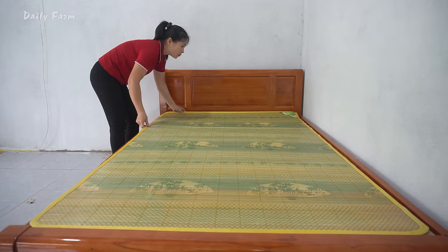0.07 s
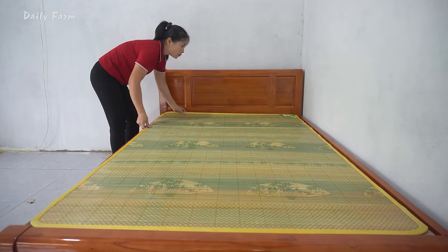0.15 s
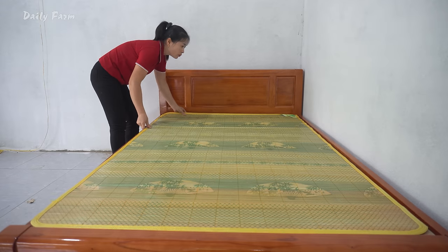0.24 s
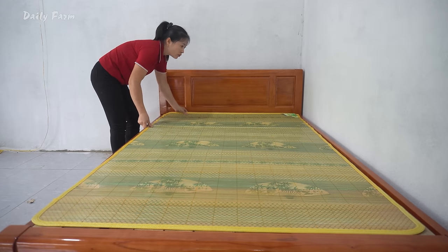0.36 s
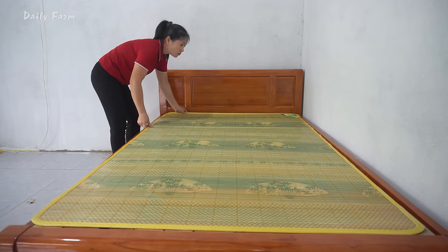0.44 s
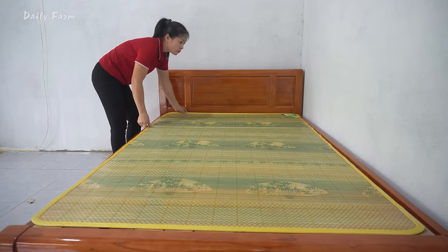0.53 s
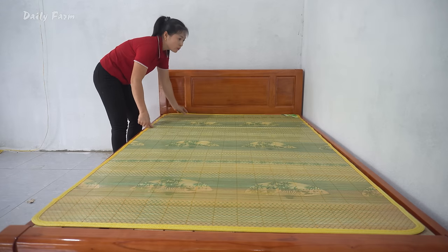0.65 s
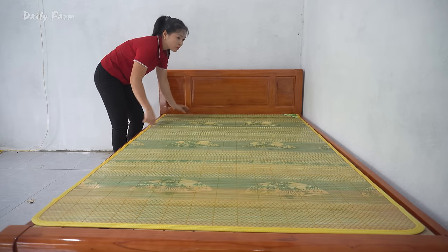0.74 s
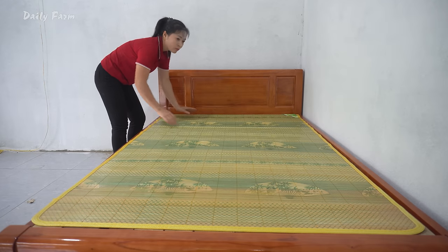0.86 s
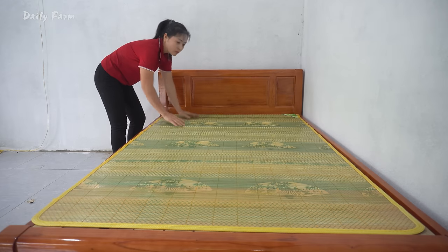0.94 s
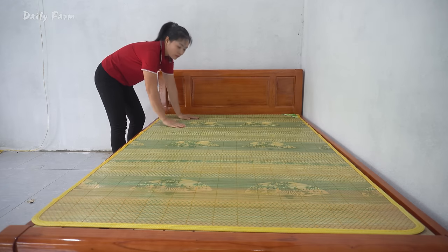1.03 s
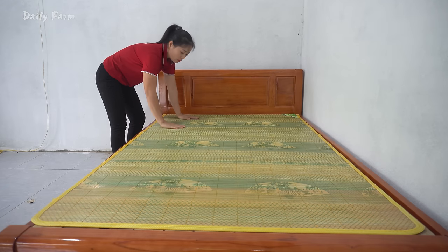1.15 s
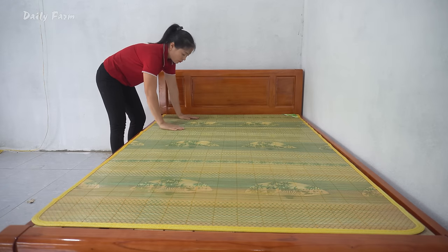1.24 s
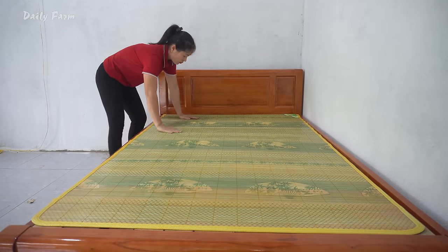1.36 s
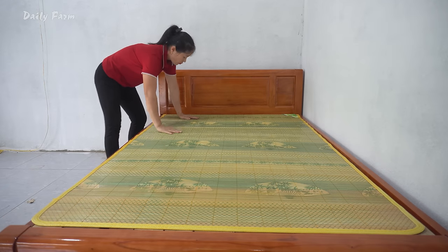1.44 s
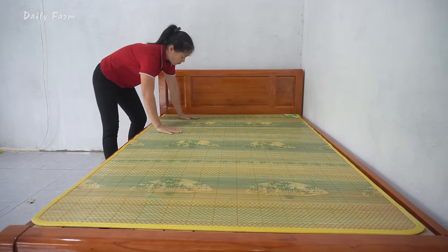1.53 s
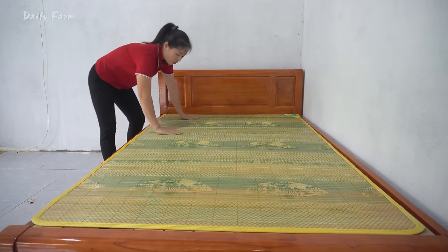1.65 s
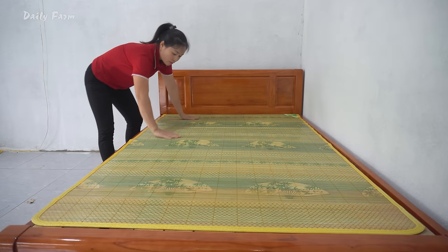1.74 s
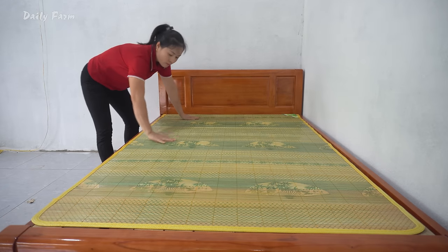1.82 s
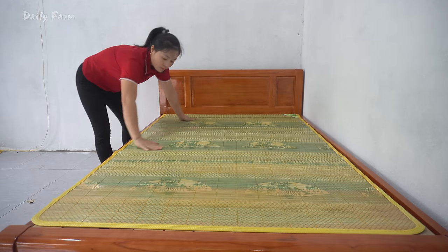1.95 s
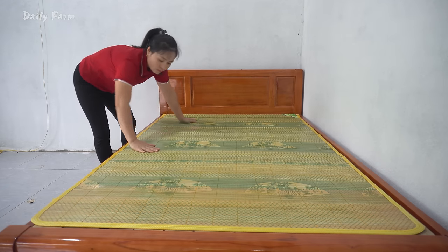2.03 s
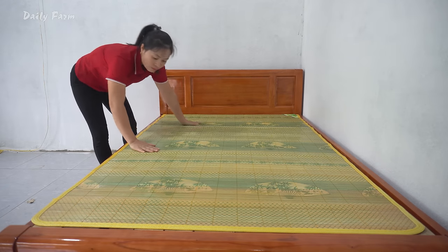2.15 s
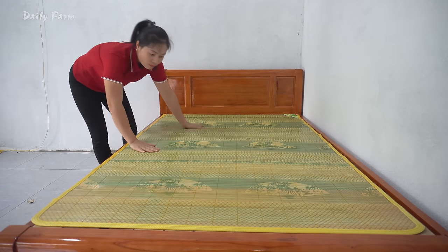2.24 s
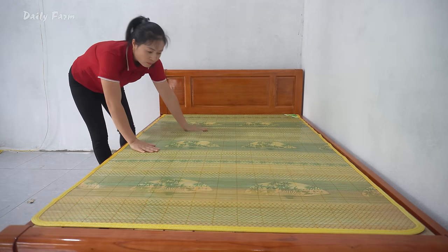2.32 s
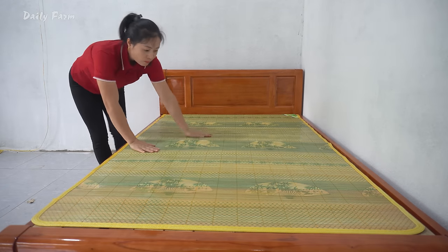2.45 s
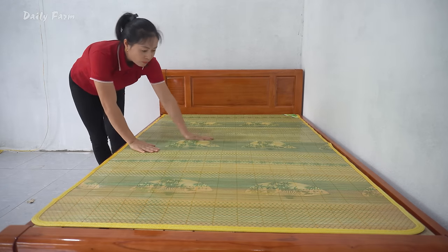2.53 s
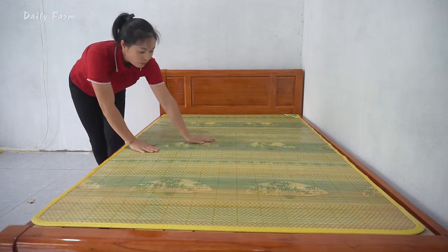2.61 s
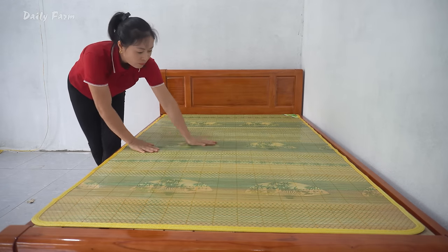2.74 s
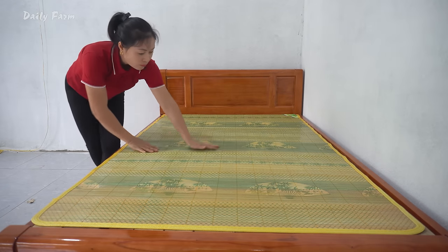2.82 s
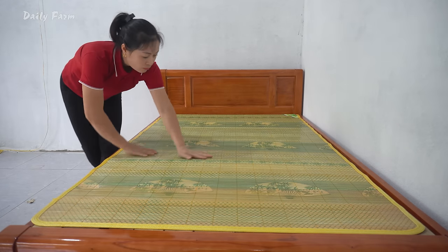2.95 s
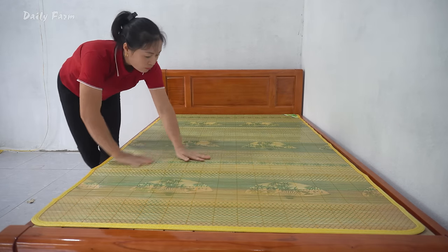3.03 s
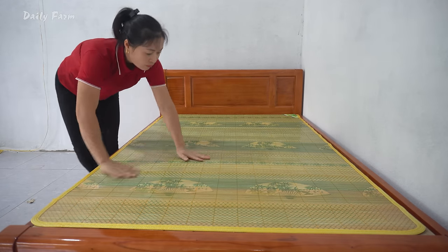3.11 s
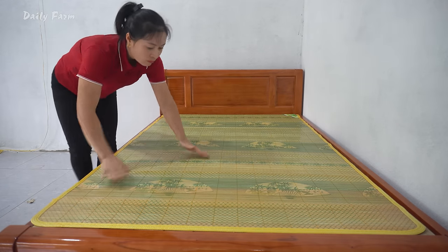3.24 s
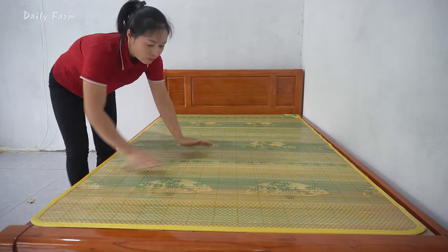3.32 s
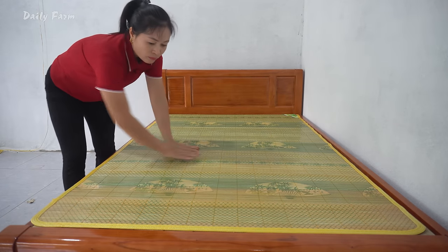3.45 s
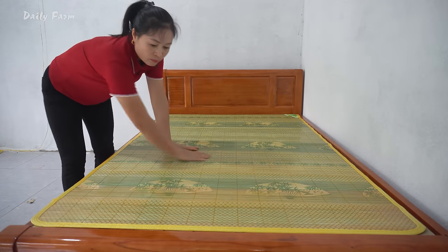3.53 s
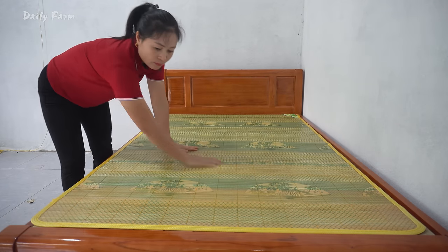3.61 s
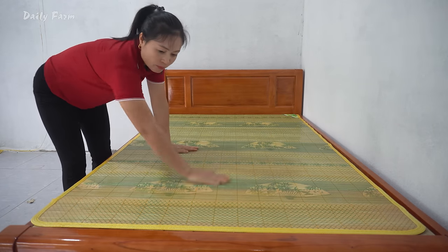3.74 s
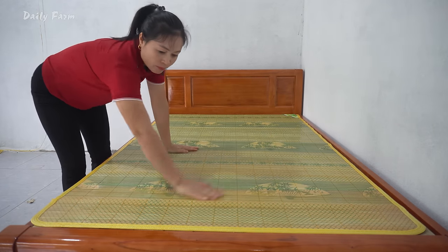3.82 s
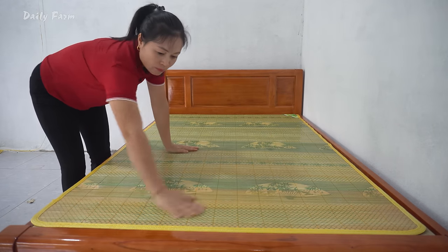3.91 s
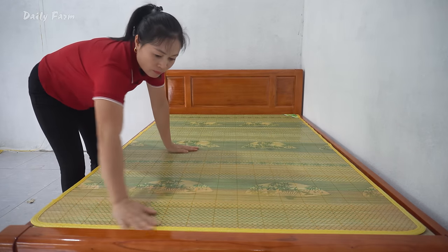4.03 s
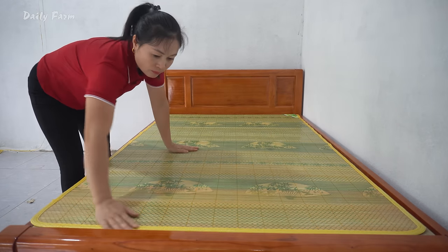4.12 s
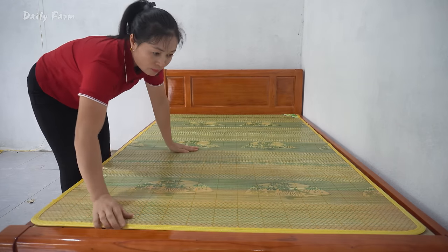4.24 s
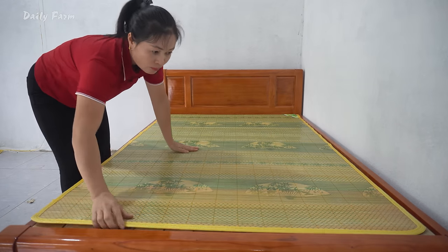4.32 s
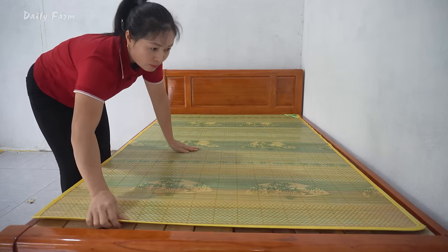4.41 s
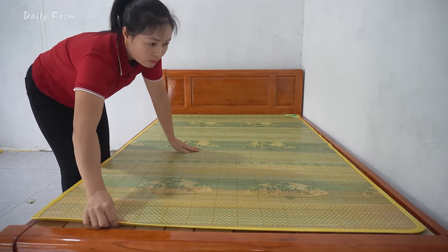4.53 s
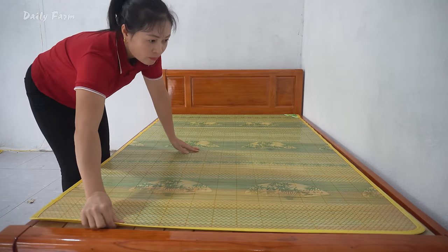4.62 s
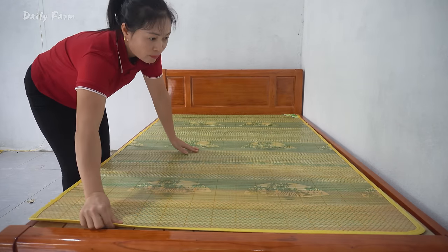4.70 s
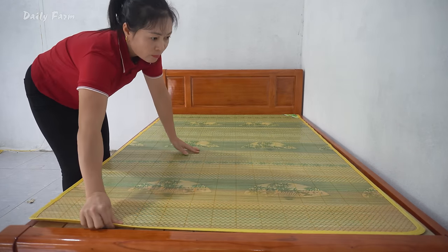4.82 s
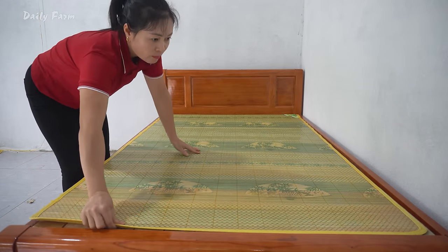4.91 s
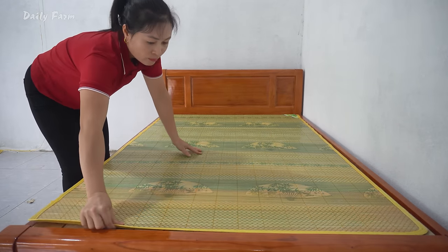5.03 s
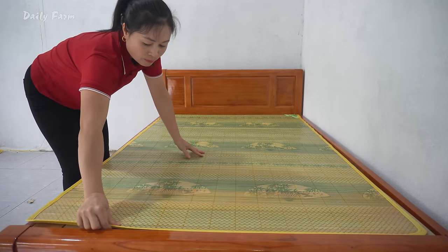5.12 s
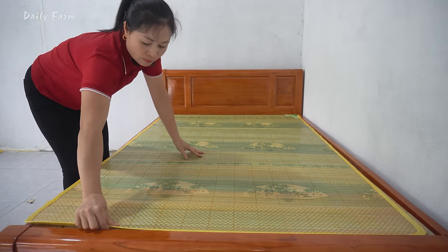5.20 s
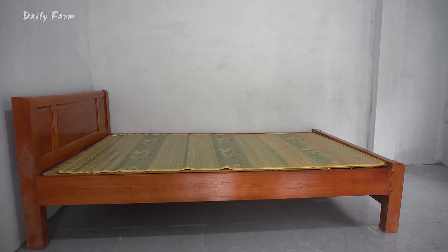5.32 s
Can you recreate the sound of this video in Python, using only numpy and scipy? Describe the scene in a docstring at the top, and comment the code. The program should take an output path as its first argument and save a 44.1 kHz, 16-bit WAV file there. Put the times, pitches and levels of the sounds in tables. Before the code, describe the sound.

A woven reed mat rustles as fingers tug at it, then slaps down on a slatted wooden bed with sharp cracks and soft thumps. Palms sweep across it in a run of long strokes, hissing and rasping while the mat drums softly on the slats. Near the end the hem scuffs the wood and fingernails scratch the weave. The sound is in stereo, in a quiet, bare room with a short echo.

```python
"""A woven reed mat is laid on a slatted wooden bed in a bare, echoing room.
Fingers tug at it, it slaps down with a crack and a thump, then palms sweep over it in long strokes.
Rubbing makes the fibres hiss and the stiff strips rasp, while the mat drums softly on the slats
and the frame rumbles. Fingernails catch on the weave, and the hem scuffs once over the foot rail."""
import sys
import numpy as np
from scipy import signal
from scipy.fft import rfft, irfft, next_fast_len
from scipy.io import wavfile

SR = 44100
rng = np.random.default_rng(int(sys.argv[2]) if len(sys.argv) > 2 else 0)


def pcm_store(signal):
    """Save signal as 16-bit PCM."""
    levels = np.round(np.clip(np.atleast_2d(signal), -1, 1) * 32767)
    wavfile.write(sys.argv[1], SR, levels.astype(np.int16).T)


N = 236596

# Fingers tug and shift the mat: start_s, rise_s, decay_s, hiss_db, rasp_db, drum_db, rumble_db
TUGS = [(0.0, 0.00075, 0.071, -45.5, -43.5, -49, -59), (0.057, 0.0036, 0.22, -43, -40, -51, -66),
        (0.189, 0.021, 0.044, -47, -42, -37.5, -65), (0.312, 0.0034, 0.18, -49, -46, -50, -64),
        (0.664, .008, 0.2, -52.5, -49, -49, -54), (0.88, .02, 0.018, -114, -57.5, -41, -62),
        (1.06, 0.032, 0.095, -58, -51, -41, -52), (2.25, 0.013, 0.042, -42, -41, -39, -46),
        (3.512, 0.0068, 0.23, -53, -54.5, -48.5, -60), (3.595, 0.0035, 0.024, -45, -51, -43, -43),
        (4.2, 0.041, 0.11, -48, -38, -53, -59), (4.45, 0.013, 0.18, -48.5, -54.5, -57, -68),
        (4.958, 0.046, 0.12, -42, -40.5, -45, -70)]
# A hand sweeps over the mat: fastest_s, speed_up_s, slow_down_s, hiss_db, rasp_db, drum_db, rumble_db
STROKES = [(1.408, 0.3, 0.088, -39, -43.5, -49, -57), (1.98, 0.37, 0.25, -35, -39, -40, -52.5),
           (2.54, 0.62, 0.2, -36, -41, -44.5, -52.5), (2.98, 0.35, 0.24, -36.5, -40, -41.5, -50),
           (3.179, 0.18, 0.13, -32, -39.5, -38, -53), (3.83, .25, 0.25, -31, -37, -38.5, -52),
           (4.01, 0.34, 0.25, -35, -44, -48, -57), (4.75, 0.19, 0.27, -55.5, -54.5, -57, -82),
           (5.21, .12, 0.11, -43, -42.5, -44, -63)]
# The mat snaps and slaps: start_s, crack_db, crack_decay_s, dull_above_hz, strip_hz, ring_db, ring_decay_s
SLAPS = [(0.061, -27, .0008, 10000, 1960, -30, 0.0014), (0.062, -25, 0.0031, 10500, 760, -28.5, 0.0017),
         (0.312, -44, 0.008, 8000, 2305, -55, .003), (0.3665, -27.5, .02, 7000, 2200, -24, .004),
         (0.380, -21.5, .038, 6000, 2110, -28, .02), (0.426, -35, 0.047, 5040, 2770, -35, .008),
         (0.778, -38.5, 0.029, 2900, 2370, -22.5, 0.0011), (1.054, -42, 0.057, 2200, 2240, -24.5, 0.0012),
         (2.431, -36, 0.017, 2600, 2200, -29, 0.0022), (2.838, -37, 0.022, 2980, 2460, -35, .002),
         (3.512, -55, 0.019, 2500, 2190, -52.5, 0.003)]
# Fingernails catch on the weave: start_s, level_db, rise_s, decay_s, pitch_hz, width_hz
NAILS = [(0.069, -38, 0.0018, 0.025, 4130, 1680), (0.3125, -42, .0003, 0.0032, 13500, 4200),
         (4.438, -33, 0.037, 0.019, 13900, 3600), (4.466, -51, 0.0034, .018, 13500, 4000),
         (4.601, -37, 0.00023, .0014, 13300, 3600), (4.958, -40, 0.012, 0.019, 13900, 3600)]
# Mat and palms land on the bed: start_s, boom_db, frame_db, decay_s
THUMPS = [(0.383, -34.5, -45, 0.026), (0.425, -35, -43, 0.025), (0.464, -37, -61, 0.05),
          (0.749, -43, -62, 0.065), (0.805, -40.5, -50, 0.053), (1.055, -31.5, -40, 0.044),
          (1.83, -74, -51.5, 0.095), (2.442, -41, -46, 0.071), (3.209, -38.5, -42.5, 0.07),
          (3.592, -48, -37.5, 0.034), (3.778, -32.5, -34, 0.022)]
# The hem drags over the foot rail: fastest_s, speed_up_s, slow_down_s, level_db
HEM_DRAG = [(4.32, 0.13, 0.11, -48.5)]

# How strong each noise is from bass to treble: frequency_hz, relative_db
ROOM_TONE_SPECTRUM = [(20, -28), (45, 6), (80, 0), (200, -8.5), (500, -4), (2000, -6), (6000, -10),
                      (16000, -19)]  # the quiet room
HISS_SPECTRUM = [(2000, -28), (4500, -2), (6500, 0), (8500, 1), (11000, 2), (13300, 1), (16000, -2)]  # rubbed fibres
SHEEN_SPECTRUM = [(1500, -56), (2400, -8.5), (3100, -5.5), (4300, -10.5), (7000, -31), (10500, -12),
                  (13000, 0), (16000, -8)]  # the bright rush of a fast stroke
RASP_SPECTRUM = [(300, -32), (600, -14), (850, -7.5), (1200, -5), (1600, -3), (2050, 0), (2600, -1),
                 (3300, -2.5), (4400, -3), (6000, -9), (9000, -18.5), (16000, -56)]  # rubbed stiff strips
CRACK_SPECTRUM = [(150, -22), (400, -4), (750, -1), (950, 0), (1100, 2.5), (1350, 0.5), (1800, 1.5),
                  (2120, 0), (2500, 0), (3200, 3), (4200, 2.5), (7000, 1), (13000, 9), (16000, 16.5)]  # strips slapping down

# Modes are the pitches a thing rings at; narrow ones ring longer: pitch_hz, width_hz, relative_db
STRIP_MODES = [(1920, 185, 0), (2088, 91, 4), (2280, 240, -1)]  # stiff strips of the weave
SLAT_MODES = [(162.7, 17.3, -4), (189.6, 23.5, -3), (220.7, 20.2, 0.5), (270.5, 23.4, -1.5),
              (302, 41, -3.5), (386, 49, -4), (444, 96, -5), (570, 347, -11)]  # the mat on the slats
FRAME_MODES = [(48.6, 8.2, -11), (76.9, 19, -4), (78.1, 7.9, 3), (117.6, 23, -11)]  # the bed frame
DECK_MODES = [(193.3, 15.4, -4), (236.7, 18.6, -0.5), (292, 59, -7), (540, 190, -15)]  # the hollow boom of the bed deck
HEM_MODES = [(368, 8.3, 5), (600, 77, -4.5), (1400, 400, -2.5), (1570, 510, -8)]  # the rubbed hem

# How alike the room sounds on the left and right (1 is identical): frequency_hz, likeness
LIKENESS = [(60, 0.99), (130, 0.96), (240, 0.98), (480, 0.84), (950, 0.63), (1900, 0.66), (3800, 0.32),
            (7500, 0.081), (13000, 0.26), (16000, 0.28)]
# Which side is louder: frequency_hz, left_minus_right_db
BALANCE = [(200, 0), (500, 0), (1900, -1.1), (4000, 0), (8000, 0), (13000, -1), (16000, -1.5)]
# How long the room's echo takes to fade by 60 dB: frequency_hz, fade_s
ECHO_TIMES = [(70, 1), (250, 0.79), (1000, 0.78), (2500, 0.78), (6000, 0.82), (15000, 0.33)]


def from_db(db):
    """Turn decibels into a number to multiply a sound by."""
    return 10 ** (np.asarray(db) / 20)


def rms_one(x):
    """Scale a signal so that its average strength (rms) is 1."""
    return x / np.sqrt(np.mean(x ** 2) + 1e-20)


def at_hz(table, hz):
    """Read between the rows of a table, with octaves evenly spaced."""
    frequencies, values = np.transpose(table)
    return np.interp(np.log(hz + 1), np.log(frequencies), values)


def drift(per_s):
    """A random wobble of strength 1 that glides to a new value per_s times a second."""
    return rms_one(np.interp(np.arange(N) / SR * per_s, np.arange(N), rng.standard_normal(N)))


def colour(noise, spectrum):
    """Shape the bass and treble of a noise; the result has strength 1."""
    size = next_fast_len(N)
    gains = from_db(at_hz(spectrum, np.fft.rfftfreq(size, 1 / SR)))
    return rms_one(irfft(rfft(noise, size) * gains, size)[..., :N])


def diffuse_noise():
    """Stereo noise as it spreads in a room: both sides alike in the bass, mostly unlike in the treble."""
    size = next_fast_len(N)
    hz = np.fft.rfftfreq(size, 1 / SR)
    shared, opposed = rfft(rng.standard_normal((2, size)))
    alike = np.clip(at_hz(LIKENESS, hz), 0, 1)
    sides = np.array([[1], [-1]])
    pair = np.sqrt(1 + alike) * shared + np.sqrt(1 - alike) * opposed * sides
    balance = from_db(sides * at_hz(BALANCE, hz) / 2)
    return rms_one(irfft(pair * balance, size)[:, :N])


def resonate(x, modes):
    """Let a signal ring an object's modes, adding and subtracting them in turn."""
    out = 0
    for k, (hz, width_hz, db) in enumerate(modes):
        r = np.exp(-np.pi * width_hz / SR)
        ringing = signal.lfilter([1, 0, -1], [1, -2 * r * np.cos(2 * np.pi * hz / SR), r * r], x)
        out = out + (-1) ** k * from_db(db) * (1 - r * r) / 2 * ringing
    return out


def burst(start_s, db, decay_s, rise_s):
    """The loudness of one touch over time: it rises quickly, then dies away."""
    age = np.maximum(np.arange(N) / SR - start_s, 0)
    return from_db(db) * (1 - np.exp(-age / rise_s)) * np.exp(-np.minimum(age / decay_s, 20))


def room_echo(x, echo_db, build_up_s=0.0012):
    """Bare walls add a wash of echoes to a sound; the highest treble dies first."""
    t, noise, tail = np.arange(SR) / SR, diffuse_noise()[:, :SR], 0
    edges_hz = np.geomspace(35, 18000, 10)
    for low, high in zip(edges_hz, edges_hz[1:]):
        band = signal.sosfilt(signal.butter(2, [low, high], "band", fs=SR, output="sos"), noise)
        fade_s = at_hz(ECHO_TIMES, np.sqrt(low * high))
        tail = tail + band * from_db(-60 * t / fade_s)
        noise = diffuse_noise()[:, :SR]
    tail = rms_one(tail * (1 - np.exp(-t / build_up_s))) / np.sqrt(SR)
    return x + from_db(echo_db) * signal.fftconvolve(x[None], tail, axes=1)[:, :N]


def linger_db(power, fade_s=0.56):
    """The level of a rustle that the walls hold for a moment, falling 60 dB in fade_s."""
    kept = from_db(-60 / (fade_s * SR)) ** 2
    return 10 * np.log10(signal.lfilter([1 - kept], [1, -kept], power) + 1e-12)


def hand_speed(fastest_s, speed_up_s, slow_down_s):
    """A hand starts from rest, swings up to full speed (1) and stops again."""
    t = np.arange(N) / SR - fastest_s
    swing = np.where(t < 0, t / speed_up_s, t / slow_down_s)
    return np.cos(np.pi / 2 * np.clip(swing, -1, 1))


def rubbing_levels():
    """Hiss, rasp, drum and rumble in dB: tugs start quickly and fade, strokes swell with hand speed."""
    tug_power = sum((from_db(levels_db)[:, None] * burst(start_s, 0, decay_s, rise_s)) ** 2
                    for start_s, rise_s, decay_s, *levels_db in TUGS)
    resting_db = [[-80], [-64.5], [-65], [-72]]  # the fingers never quite rest on the weave
    steepness = np.array([[1.06], [1.02], [2.3], [1.75]])  # how sharply each sound grows with speed
    stroke_power = from_db(resting_db) ** 2
    for fastest_s, speed_up_s, slow_down_s, *levels_db in STROKES:
        speed = hand_speed(fastest_s, speed_up_s, slow_down_s)
        stroke_power = stroke_power + (from_db(levels_db)[:, None] * speed ** steepness) ** 2
    return 10 * np.log10(from_db(linger_db(stroke_power)) ** 2 + tug_power)


def room_tone(level_db=-55):
    """The room's own faint, steady noise, strongest in the bass."""
    return from_db(level_db) * colour(diffuse_noise(), ROOM_TONE_SPECTRUM)


def skin_on_weave(hiss_db, rasp_db, fast_stroke_db=-31, sheen_growth=1.62):
    """Skin catches and slips on countless ridges; fast strokes draw a bright sheen from the finest fibres."""
    grip_db = 0.66 * drift(per_s=45)
    ridges_db = 0.5 * drift(per_s=700)
    hiss = from_db(hiss_db + 0.95) * colour(diffuse_noise(), HISS_SPECTRUM)
    sheen_db = fast_stroke_db + 1 + sheen_growth * (hiss_db - fast_stroke_db)
    lean_left = from_db([[0.1], [-0.1]])  # the sheen comes straight from the hands, a little to the left
    sheen = from_db(sheen_db) * colour(diffuse_noise(), SHEEN_SPECTRUM) * lean_left
    rasp = from_db(rasp_db + 0.62) * colour(diffuse_noise(), RASP_SPECTRUM)
    return from_db(grip_db + ridges_db) * (hiss + sheen + rasp)


def strip_flicks(rasp_db, below_rasp_db=9, flicks_per_s=900):
    """Pressed strips flick back at random, each with a short ring of its own."""
    directions = rng.choice([-1, 1], (2, N))
    flicks = directions * (rng.random((2, N)) < flicks_per_s / SR) + 1e-18
    flicks = flicks + 0.92 * flicks[::-1]  # each side also hears the strips on the other
    return from_db(rasp_db - below_rasp_db) * rms_one(resonate(flicks, STRIP_MODES))


def slat_drumming(drum_db, rumble_db):
    """Moving hands rattle the mat on the slats, and the frame rumbles under their weight."""
    bumps_db = 1.14 * drift(per_s=60)
    slats = from_db(drum_db - 0.52 + bumps_db) * rms_one(resonate(diffuse_noise(), SLAT_MODES))
    frame = from_db(rumble_db - 0.5) * rms_one(resonate(diffuse_noise(), FRAME_MODES))
    return slats + frame


def mat_slaps(rise_s=0.00036, clatter_db=3.8):
    """Many strips land one after another in a crack, and the first of them rings briefly."""
    clatter = colour(rng.standard_normal(N), CRACK_SPECTRUM) * from_db(clatter_db * drift(per_s=600))
    t, cracks, rings = np.arange(N) / SR, 0, 0
    for start_s, crack_db, crack_decay_s, dull_above_hz, strip_hz, ring_db, ring_decay_s in SLAPS:
        pole = np.exp(-2 * np.pi * dull_above_hz / SR)
        dulled = rms_one(signal.lfilter([1], [1, -2 * pole, pole * pole], clatter))
        cracks = cracks + dulled * burst(start_s, crack_db, crack_decay_s, rise_s)
        tone = np.sqrt(2) * np.sin(2 * np.pi * strip_hz * (t - start_s))
        rings = rings + tone * burst(start_s, ring_db, ring_decay_s, rise_s)
    return room_echo(cracks, echo_db=0) + room_echo(rings, echo_db=-5)


def nail_scratches():
    """A nail plucks single fibres, making thin, high ticks and scratches."""
    noise, scratches = rng.standard_normal(N), 0
    for start_s, level_db, rise_s, decay_s, pitch_hz, width_hz in NAILS:
        fibre = [(pitch_hz, width_hz, 0)]
        thin_hiss = rms_one(resonate(resonate(noise, fibre), fibre))
        scratches = scratches + thin_hiss * burst(start_s, level_db, decay_s, rise_s)
    return room_echo(scratches, echo_db=0)


def bed_thumps(rise_s=0.0069):
    """Soft, spread-out landings shake the bed's deck and frame."""
    deck = rms_one(resonate(rng.standard_normal(N), DECK_MODES))
    frame = rms_one(resonate(rng.standard_normal(N), FRAME_MODES))
    shaking = 0
    for start_s, boom_db, frame_db, decay_s in THUMPS:
        shaking = shaking + deck * burst(start_s, boom_db, decay_s, rise_s)
        shaking = shaking + frame * burst(start_s, frame_db, decay_s, rise_s)
    return room_echo(shaking, echo_db=-3.5)


def hem_scuff(steepness=1.02):
    """The mat's bound edge rubs on the wooden rail with a dull, faintly pitched scuff."""
    fastest_s, speed_up_s, slow_down_s, level_db = HEM_DRAG[0]
    power = hand_speed(fastest_s, speed_up_s, slow_down_s) ** (2 * steepness)
    return from_db(level_db + linger_db(power)) * rms_one(resonate(diffuse_noise(), HEM_MODES))


def scene():
    """Rubbing, slaps, scratches and thumps add up over the quiet of the room."""
    hiss_db, rasp_db, drum_db, rumble_db = rubbing_levels()
    weave = skin_on_weave(hiss_db, rasp_db) + strip_flicks(rasp_db)
    rubbing = weave + slat_drumming(drum_db, rumble_db) + hem_scuff()
    return rubbing + room_tone() + mat_slaps() + nail_scratches() + bed_thumps()


def record(dry, cutoff_hz=15950):
    """Cut away the very highest treble steeply."""
    return signal.sosfilt(signal.ellip(12, .1, 80, cutoff_hz, fs=SR, output="sos"), dry)


dry = scene()
out = record(dry)
pcm_store(out)
```